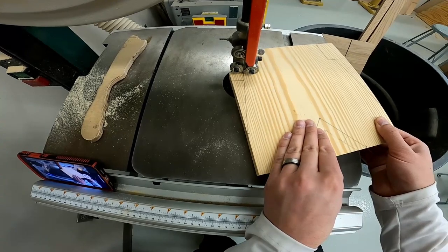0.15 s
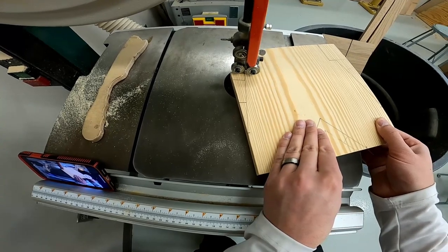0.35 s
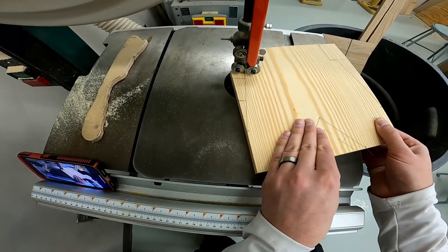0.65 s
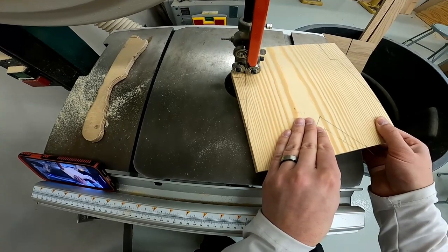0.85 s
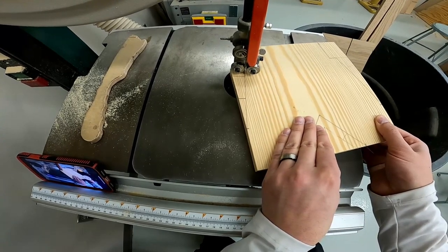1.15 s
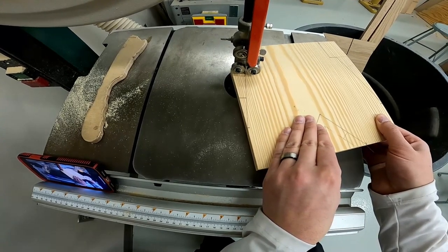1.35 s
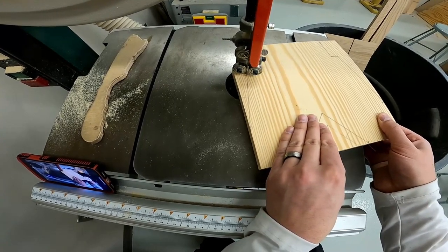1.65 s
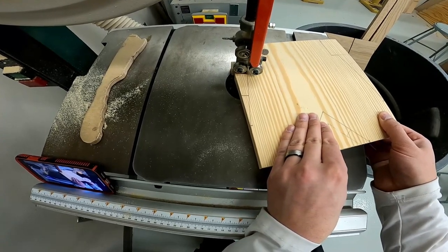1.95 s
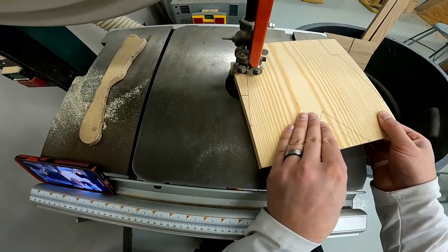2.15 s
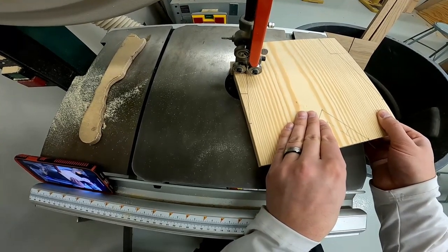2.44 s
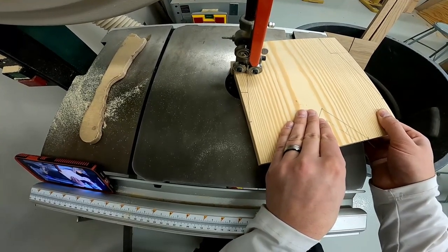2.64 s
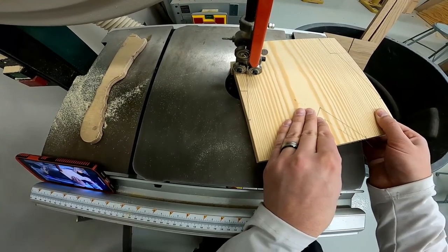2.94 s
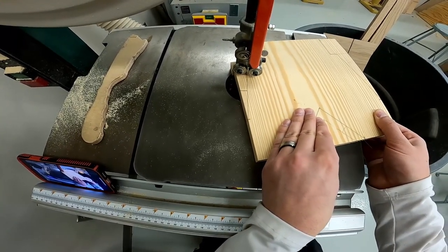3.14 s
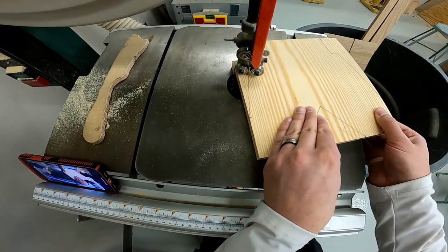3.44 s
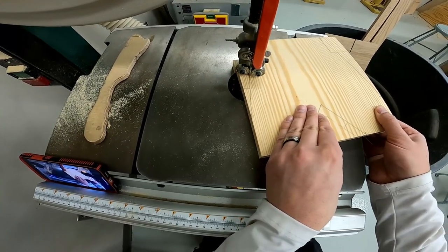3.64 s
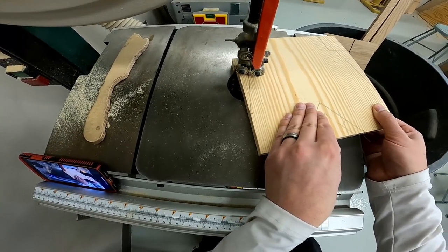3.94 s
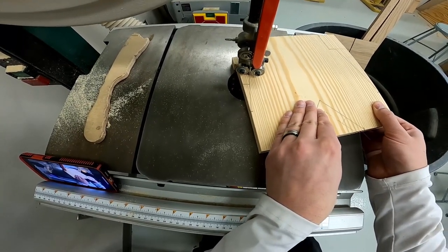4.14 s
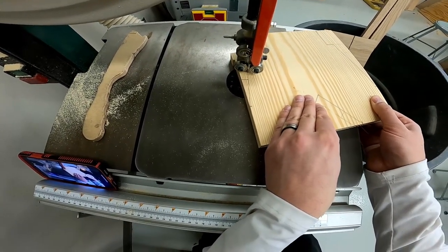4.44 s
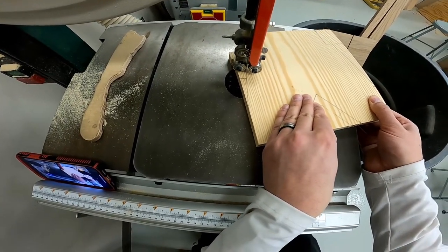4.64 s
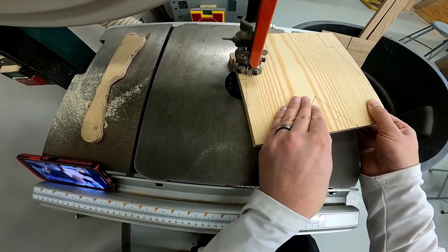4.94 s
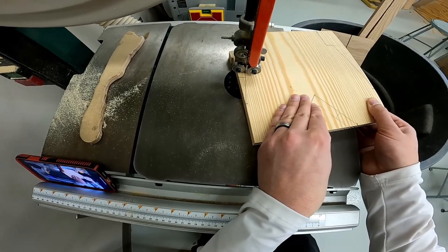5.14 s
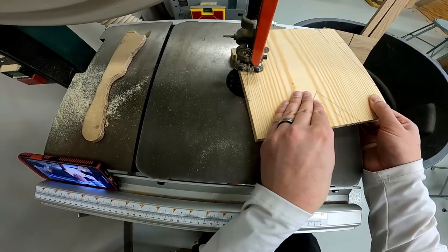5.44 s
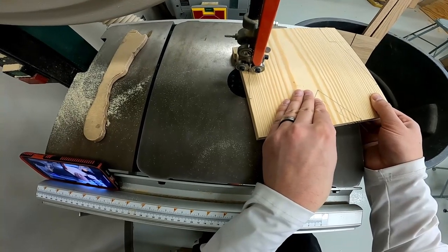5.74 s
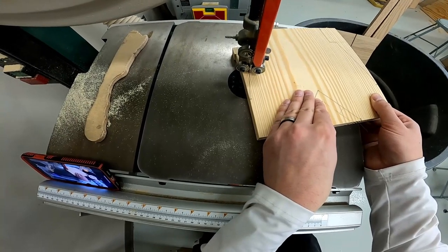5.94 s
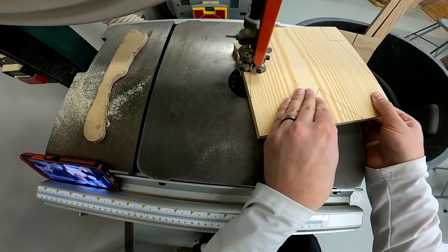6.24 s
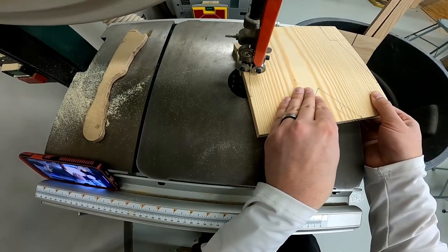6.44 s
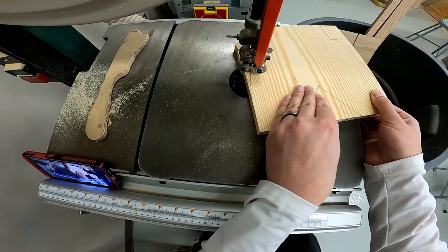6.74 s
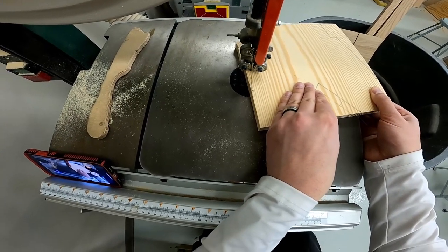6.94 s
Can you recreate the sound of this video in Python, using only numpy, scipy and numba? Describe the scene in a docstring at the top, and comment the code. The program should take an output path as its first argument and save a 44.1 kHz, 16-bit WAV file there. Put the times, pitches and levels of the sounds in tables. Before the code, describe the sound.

Continuous band saw cutting of softwood, already under way and never stopping. Motor hum and cabinet rumble lie beneath a shrill blade whine with fluttering edges and gritty hiss. Squeaky resonances come and go, with short downward-gliding squeals near six seconds before the clear ringing returns. Heard close from above the table by a small stereo microphone, slightly right-first, with faint workshop reflections.

```python
"""A band saw cuts slowly into a pine board for 7 s, heard by a small two-port microphone above the table.
Throughout, teeth whine at about 988 strikes/s, chips hiss, and the motor hums at twice the mains rate.
The span of the blade rings strongly at first, weakens near 2 s, returns from 3 to 4 s and weakens again.
Resonances of board and blade come and go as the kerf grows; near 6 s short ones glide down in pitch.
At the end the span rings strongly again. Tones are sines; hiss and ringing are filtered noise."""
import sys
import numpy as np
from scipy import signal
from scipy.fft import rfft, irfft, next_fast_len
from scipy.io import wavfile
from scipy.ndimage import uniform_filter1d
from numba import njit

SR = 44100
rng = np.random.default_rng(int(sys.argv[2]) if len(sys.argv) > 2 else 0)


def store_pcm(level_fs):
    """Save levels as 16-bit WAV."""
    pcm = np.round(np.clip(level_fs, -1, 1) * 32767).astype(np.int16)
    wavfile.write(sys.argv[1], SR, np.atleast_2d(pcm).T)


N = 312333
T = np.arange(N) / SR  # s
LOOP_HZ, WHEEL_HZ, FLUTTER_HZ = 6.345, 25.4, 101.6  # blade loop, wheel, span


def undb(db):
    """Gain of a level in dB."""
    return 10 ** (np.asarray(db) / 20)


def level(x, db):
    """Scale to an rms level."""
    return x * undb(db) / np.sqrt(np.mean(x ** 2))


def curves(table):
    """Columns of a table, interpolated to every sample."""
    s, *columns = np.transpose(table)
    return [np.interp(T, s, column) for column in columns]


def colour(x, points):
    """Filter by (Hz, dB) points joined on a log-frequency axis."""
    size = next_fast_len(N)
    hz, db = np.transpose(points)
    bin_hz = np.arange(size // 2 + 1) * SR / size
    gain = undb(np.interp(np.log(bin_hz + 1), np.log(hz), db))
    return irfft(rfft(x, size) * gain, size)[..., :N]


def shift(x, points):
    """Turn the phase by (Hz, radians) points."""
    size = next_fast_len(N)
    bin_hz = np.arange(size // 2 + 1) * SR / size
    turn_rad = np.interp(bin_hz, *np.transpose(points))
    return irfft(rfft(x, size) * np.exp(1j * turn_rad), size)[:N]


@njit
def svf(x, hz, width):
    """Band-pass whose centre and width may move, gain 1 at the centre."""
    y, band, low = np.empty(len(x)), 0., 0.
    for i in range(len(x)):
        g, k = np.tan(np.pi * hz[i] / SR), width[i] / hz[i]
        v = (band + g * (x[i] - low)) / (1 + g * (g + k))
        band, low, y[i] = 2 * v - band, low + 2 * g * v, k * v
    return y


def ring(x, hz, width):
    """A fixed resonance, applied twice for steep skirts."""
    peak = signal.iirpeak(hz, hz / max(width, 2.), SR)
    return signal.lfilter(*peak, signal.lfilter(*peak, x))


def walk(rate):
    """Smooth random wandering, about half of rate turns a second; spread near 1."""
    knots = np.convolve(rng.standard_normal(int(4 * rate * N / SR) + 9), np.hanning(9), "same")
    return np.interp(T * 4 * rate, np.arange(len(knots)), knots / knots.std())


def swell(start, length):
    """Rises from 0 to 1, holds and falls again; one that starts at 0 s is already up."""
    half_s = 0.025  # half of each edge
    end = start + length
    edges = [start - half_s, start + half_s, end - half_s, end + half_s]
    return np.interp(T, np.sort(edges), [0 if start else 1, 1, 1, 0])


def throb(wheel, flutter):
    """The blade loop sways once a round, the wheel runs out once a turn, the span flutters four times as fast."""
    sway = 0.12 * np.sin(2 * np.pi * LOOP_HZ * T + 3.44 * walk(1.986))
    runout = wheel * np.sin(2 * np.pi * WHEEL_HZ * T)
    return 1 + sway + runout + flutter * np.sin(2 * np.pi * FLUTTER_HZ * T + .5 * walk(13))


def weld():
    """The ringing falters each time the weld of the blade loop passes through the kerf."""
    first_s, dip_db, sharpness = .055, 1, 9
    passing = np.exp(sharpness * (np.cos(2 * np.pi * LOOP_HZ * (T - first_s)) - 1))
    return undb(-dip_db * passing)


def rumble():
    """Wheels, belt and air: low noise, one stream direct and two by way of the walls."""
    # spectrum: hz, relative_db
    tone = [(20, -23), (50, -5), (100, 13), (150, -2), (400, -10), (650, -40), (1500, -44)]
    return level(colour(rng.standard_normal((3, N)), tone), -43)


def machine(hum_db):
    """Magnetic hum at twice the mains rate, mains overtones, and cabinet panels ringing with noise."""
    hum_hz = 119.92
    # mains overtones: hz, rms_db
    overtones = [(480, -49.5), (539.5, -52.5), (599, -65)]
    # cabinet panels: hz, relative_width_hz, rms_db
    panels = [(89, 5, -45), (176, 8.3, -51), (202.4, 4.3, -54.5), (244.9, 8.8, -43.5), (265.5, 5.1, -49.5),
              (296, 4.8, -56.5), (339.2, 14, -48), (381.5, 19, -45.5), (552, 12, -57)]
    hum = undb(hum_db + 3.5) * np.sin(2 * np.pi * hum_hz * T)
    hum = hum + sum(level(np.sin(2 * np.pi * hz * T), db) for hz, db in overtones)
    shake = rng.standard_normal(N)
    return hum + sum(level(ring(shake, hz, 1.17 * width), db) for hz, width, db in panels)


def slides():
    """The scrape of the blade flank rings gliding resonances, some of them in short pieces."""
    # as the board turns against the blade: start_s, length_s, from_hz, to_hz, width_hz (per pass), relative_db
    glides = [(0.05, 2.5, 5510, 5500, 45, -35), (4.13, 0.14, 4840, 4860, 250, -28),
              (4.31, 0.15, 4880, 4780, 250, -28), (4.452, .12, 4800, 4770, 300, -30),
              (5.595, 0.33, 7660, 6770, 700, -32), (5.91, 0.08, 5650, 5350, 450, -27),
              (5.952, 0.1, 5100, 4650, 350, -29), (6.03, 0.069, 5500, 5140, 400, -26),
              (6.14, 0.077, 5470, 5170, 450, -27.5)]
    out = 0
    for start, length, from_hz, to_hz, width, db in glides:
        hz = np.interp(T, [start, start + length], [from_hz, to_hz]) * (1 + 0.0017 * walk(6.3))
        wide = np.full(N, 1. * width)
        gain = swell(start, length) * weld() * undb(1.2 * walk(25))
        scrape = svf(svf(rng.standard_normal(N), hz, wide), hz, wide)
        out = out + gain * level(scrape, db)
    return out


def rings():
    """Resonances fade in and out and dip as the weld passes; the narrowest lock into a clear squeal."""
    # passing resonances of board and blade: start_s, length_s, hz, relative_width_hz, relative_db;
    # at a width of 20 and below a sine, whose phase wanders with walk(width)
    resonances = [(0, .9, 3130, 250, -37), (0, 1, 7500, 300, -42), (0, 1.9, 12100, 200, -53),
                  (0, 2, 3318, 15, -46), (.2, 1.8, 3480, 150, -38), (0, 2.8, 1095, 28, -41),
                  (0, 5.8, 1150, 200, -46), (0, 3.2, 2740, 100, -42), (1.4, .65, 1010, 60, -41),
                  (1.5, .5, 3000, 30, -35), (1.95, .4, 2950, 80, -38), (1.9, 1, 5750, 250, -35),
                  (2.1, 1.1, 3500, 180, -32), (2, 1, 6720, 120, -45), (2.1, 3.6, 1430, 60, -42),
                  (2.2, .5, 1200, 150, -42), (2.26, .32, 2347, 5, -38), (2.57, .18, 2347, 5, -41),
                  (2.75, .12, 2347, 5, -44), (2.29, .14, 3225, 8, -35), (2.46, .14, 3225, 18, -39),
                  (2.7, 1.2, 7540, 90, -41), (3.3, 4.6, 2750, 120, -48), (3.6, 1.4, 11900, 200, -50),
                  (3.6, 1.6, 1880, 100, -41), (3.6, 2.4, 2080, 40, -42), (3.8, 1.5, 8700, 120, -40),
                  (6.105, .035, 4940, 10, -31), (6.14, .04, 4500, 400, -36), (3.68, .07, 3560, 18, -35),
                  (3.92, .045, 3540, 18, -31), (4.265, .05, 3690, 18, -26), (2.3, .75, 5550, 40, -41),
                  (4.5, 1.2, 1615, 30, -43), (4.5, 1.6, 13750, 80, -61), (4.4, 1.2, 4340, 90, -36),
                  (4.7, 1.1, 5570, 40, -43), (5.1, .6, 7400, 500, -39), (5.21, .11, 386, 5, -39),
                  (5.39, .13, 378, 5, -40), (5.25, .07, 465, 12, -42), (5.31, .095, 388, 5, -30),
                  (5.3, 2.4, 5350, 250, -39), (6.1, 1.1, 14120, 20, -60), (6.1, 1.2, 1620, 50, -47),
                  (6.1, 1.2, 1870, 120, -43), (6.2, 1, 8950, 200, -46)]
    out = np.zeros(N)
    for start, length, hz, width, db in resonances:
        on = (T > start) & (T < start + length)
        t = T[on] - start
        noisy = width > 20
        fade_s = .2 * length if noisy else min(.2 * length, .025)
        edge_s = np.minimum(t if start else length, length - t)  # those from 0 s are already up
        fade = np.clip(edge_s / fade_s, 0, 1)
        if noisy:
            tone = ring(rng.standard_normal(len(t)), hz, 1.5 * width)
        else:
            tone = np.sin(2 * np.pi * hz * t + walk(width)[on])
        out[on] += fade * level(tone, db) * undb(1.4 * walk(8)[on])
    return out * weld()


def bites(phase):
    """Chips break away in a random puff behind each tooth: one stream heard directly, two by way of the walls."""
    loop, echo = int(SR / LOOP_HZ), .35  # samples a round, share of a round that repeats
    noise = rng.standard_normal((3, N // loop + 1, loop))
    rounds = signal.lfilter([1], [1, -echo], noise, axis=1)  # the same teeth come round again
    return rounds.reshape(3, -1)[:, :N] * (1 + .3 * np.sin(phase)) * throb(.06, .1)


def chips(phase, *levels_db):
    """Hiss of breaking fibres through countless small modes that come and go; its ends change with the grain."""
    # hiss spectrum: hz, relative_db
    tone = np.array([(500, -34), (650, -38.5), (850, -35.5), (1200, -36.5), (1450, -28), (1700, -33),
                     (2000, -24.5), (2250, -32), (2450, -32.5), (2750, -29.5), (3200, -26.5), (3850, -14.5),
                     (4600, -24.5), (5800, -21.5), (6200, -30), (6800, -29.5), (8000, -30), (10000, -39.5),
                     (11000, -45.5), (12000, -42.5), (13000, -50), (15000, -75)])
    hz, s, parts = signal.stft(bites(phase), SR, nperseg=1024)
    chip_db, low_db, high_db = (np.interp(s, T, c) for c in levels_db)
    field = rng.standard_normal((len(hz), len(s)))
    slow = uniform_filter1d(field, size=110, axis=1)  # each bin over 1.3 s
    quick = uniform_filter1d(uniform_filter1d(field, size=12, axis=0), size=9, axis=1)
    ends_db = np.outer(hz < 3000, low_db) + np.outer(hz > 6200, high_db)
    db = uniform_filter1d(ends_db, size=15, axis=0)
    db = db + 4.05 * slow / slow.std() + 0.55 * quick / quick.std()
    db = db + chip_db + np.interp(np.log(hz + 1), np.log(tone[:, 0]), tone[:, 1])[:, None]
    return undb(31.5) * signal.istft(parts * undb(db), SR, nperseg=1024)[1][:, :N]


def blade(phase, hz, width, db):
    """The bites ring the free span of the blade, which half locks into a wavering squeal."""
    squeal_db = 1.5  # gain of the squeal before its waver; the ring has rms 1
    hz = hz * (1 + 0.004 * walk(9) + 0.00404 * walk(22))  # pitch wanders as the tension drifts
    span = np.array([level(svf(svf(x, hz, width), hz, width) / np.sqrt(width), 0) for x in bites(phase)])
    waver = (1 + 0.15 * walk(90)) * throb(.06, .18)
    squeal = waver * np.sin(2 * np.pi * np.cumsum(hz) / SR + 0.9 * walk(60))
    direct_only = np.array([[1], [0], [0]])
    return (span + undb(squeal_db) * squeal * direct_only) * undb(db - 2.0)


def whine(phase):
    """Overtones of the tooth rate swell while the kerf favours them; uneven teeth make each waver and flicker."""
    # one row per multiple of the tooth rate from the 1st up: resting_db, swells as (start_s, length_s, rise_db)
    overtones = [(-56, [(0, 3.15, 8.5), (1.55, 0.2, -8)]), (-41.5, [(1.45, .85, 7), (1.62, 0.26, 4),
                 (3.1, 1.17, 7), (6.08, 0.36, 6.5), (6.17, 0.22, 3), (6.6, 0.76, 8)]), (-50, [(0, 3.9, 10),
                 (0, .3, 8), (1.35, 0.56, 6), (1.63, .15, 4), (1.84, .12, 7.5)]), (-34.5, [(0, 0.45, 1),
                 (2.9, 4.4, 4.5), (2.95, 1.01, 6.5), (4.46, .06, 5), (4.55, 1.05, 5), (6.45, .9, 5.5)]),
                 (-51.5, [(0, .2, 14), (3.7, 2.15, 14.5), (3.7, 1, 3.5), (5.8, 0.3, 2)]),
                 (-37, [(0, 3.5, 3), (.15, 0.23, 9), (.45, 1, 10), (.75, 0.47, 1), (1.92, 0.4, 7.5),
                 (2.58, 0.34, 5.5), (3.02, 0.13, 5), (3.25, 0.26, 4), (3.56, 0.092, 7), (5.0, 3.8, 5.5),
                 (5.7, 0.089, 3), (5.84, .07, 5), (5.985, .11, 7.5), (6.13, 1.2, 3.5)]),
                 (-52, [(4.3, 3.36, 11.5), (5.5, 0.32, 5), (6.04, 0.057, 12)]), (-51, [(0, 1.9, 7),
                 (1.2, 0.32, 6.5), (2.8, 0.26, 11), (3.6, 4.2, 14), (5.6, 0.28, 0), (5.98, 0.22, -5),
                 (6.6, .7, 3)]), (-55, [(0, 1.56, 9.5), (3.9, 0.82, 12), (4.9, 2.2, 11),
                 (5.7, 0.29, 11.5)]), (-54.5, [(4.2, 1.7, 10), (6.15, 0.92, 14.5), (6.5, 0.69, 7)]),
                 (-72, []), (-50.5, [(3.8, 1, 7.5)]), (-64, []), (-58, [(4.5, 1.34, 5)])]
    # extra wheel beat: start_s, length_s, depth_db; then the rows of overtones (from 0) that it reaches
    pulses, pulsing_rows = [(1.5, .18, 2.5), (1.8, .12, 1.5), (1.92, .4, 5), (6.12, .3, 4)], (1, 2)
    # resting depth_db of the wheel's beat in each overtone
    wheel_beat_db = [1.5, 1.5, 1, .6, 1, 1, 1, 1, 1, 1, 1, 1, 1, 1]
    wobble = 0.13 * walk(30) + 0.07 * walk(4)
    extra_db = sum(db * swell(s, length) for s, length, db in pulses)
    tones = 0
    for k, (rest_db, swells) in enumerate(overtones):
        db = rest_db + sum(rise_db * swell(s, length) for s, length, rise_db in swells) + 0.52 * walk(10)
        depth_db = wheel_beat_db[k] + (k in pulsing_rows) * extra_db
        # each overtone beats with the wheel in its own time
        db = db + depth_db * np.sin(2 * np.pi * (WHEEL_HZ * T + rng.random()) + 0.57 * walk(2.07))
        db = db + (.8 + .12 * k) * walk(16)  # higher ones are more ragged
        flicker = 1 + 0.18 * walk(90)
        tone = np.sin((k + 1) * (phase + wobble) + 0.45 * walk(25) + 0.6 * walk(9))
        tones = tones + undb(db) * flicker * tone
    return np.sqrt(2) * level(throb(0.031, 0.2), 0) * tones


def scene():
    """The saw reaches the right port first; the workshop returns an unrelated wash of its noise to each port."""
    # blade speed: start_s, teeth_hz
    teeth = [(0.0, 988.2), (1.3, 986.9), (1.8, 989.0), (2.3, 989.6), (3.0, 987.8), (4.1, 987.2),
             (5.0, 988.5), (6.0, 988.8), (7.08, 987.8)]
    # the cut: start_s, span_hz, width_hz (per pass), then relative levels:
    # ring_db, chip_hiss_db, hiss_below_3_khz_db, hiss_above_6.2_khz_db
    cutting = [(0.0, 3766, 131, -25.5, -31, 0.5, -1), (0.9, 3790, 122, -27.5, -32.5, 0.2, 0.8),
               (1.5, 3707, 121, -24, -31.5, 0, 0.5), (1.8, 3722, 190, -30.5, -30.5, 0.5, 0.5),
               (2.35, 3617, 260, -30, -29.5, 1.5, -4), (2.65, 3724, 280, -29.5, -29, 2, -2.5),
               (3.05, 3770, 190, -24, -31.5, 1.5, -2), (3.4, 3775, 180, -24.5, -31.5, 1.5, -2),
               (3.68, 3770, 180.3, -25.5, -31, 2.5, -1), (3.84, 3858, 180, -23.5, -33, 4.5, 1.5),
               (3.95, 3800, 180, -23.5, -32.5, 3, -2), (4.08, 3766, 198, -25.5, -32.5, 4.5, 2.5),
               (4.45, 3833, 277, -33.5, -33, 5.5, 3.5), (5.0, 3730, 260, -31.5, -29.5, 3.5, 1),
               (5.45, 3763, 260.8, -29.5, -31, 5.5, 2.5), (5.85, 3827, 248, -26.5, -31, 2.5, -2.5),
               (6.1, 3850, 246, -32, -33, 5.5, 0.5), (6.3, 3785, 228, -28, -29, 2, -3),
               (6.7, 3746, 200.7, -25, -30.5, 1.5, -0.5), (7.08, 3724, 199.1, -24, -35, 6, 1)]
    # the listener leans about over the table: start_s, relative_hum_db, lean (scaled to dB at each port below)
    leaning = [(0.0, -23.5, -2.5), (0.3, -23, -3), (1.0, -26, -2), (1.9, -25, -3), (3.2, -26.5, -1.3),
               (4.3, -26, -1), (5.0, -24, 1.5), (5.9, -23.5, 0.5), (6.4, -21.5, 2.5), (7.08, -23, -1.8)]
    # lead of the left port: hz, phase_rad (negative lags)
    left_lead = [(0, 0.062), (2150, -0.92), (5170, -1.19), (6120, -1.89), (7700, -2.02), (8900, -1.47),
                 (10100, -2.1), (15000, -2.1)]
    # left port response: hz, gain_db
    left_tone = [(100, 1.26), (1000, 0.04), (7500, 0.5), (8600, -6), (9600, -2), (12000, -5.5), (15000, -2)]
    # wash from the walls against the direct sound: hz, gain_db
    room_tone = [(30, -4), (150, -12), (600, -3), (3000, -12), (6000, -5), (8500, 0), (12000, 5.5)]
    phase = 2 * np.pi * np.cumsum(curves(teeth)[0]) / SR
    blade_hz, blade_width, blade_db, *hiss_db = curves(cutting)
    hum_db, lean = curves(leaning)
    noise = blade(phase, blade_hz, blade_width, blade_db) + chips(phase, *hiss_db) + undb(-0.5) * rumble()
    cut = whine(phase) + undb(2.5) * rings() + slides() + noise[0]
    hum = machine(hum_db)
    left = hum + undb(0.11 * lean) * shift(cut, left_lead) + colour(noise[1], room_tone)
    right = hum + undb(-.4 * lean) * cut + colour(noise[2], room_tone)
    return np.array([colour(left, left_tone), right])


def record(dry):
    """The microphone lifts the presence range; its electronics round the peaks and cut the top."""
    # microphone response: hz, gain_db
    mic_tone = [(2000, 0), (6000, 2.5), (9000, 4), (14000, 3)]
    top_hz = 15650
    rounded = np.tanh(1.315 * colour(dry, mic_tone)) / 1.35
    return signal.sosfilt(signal.ellip(12, .2, 70, top_hz, fs=SR, output="sos"), rounded)


dry = scene()
out = record(dry)
store_pcm(out)
```